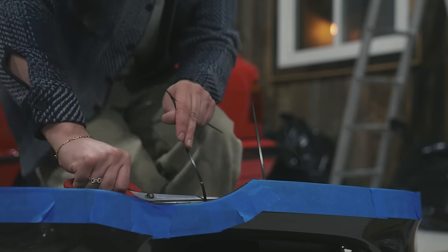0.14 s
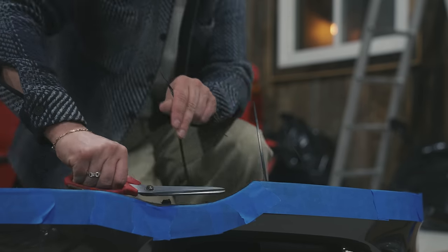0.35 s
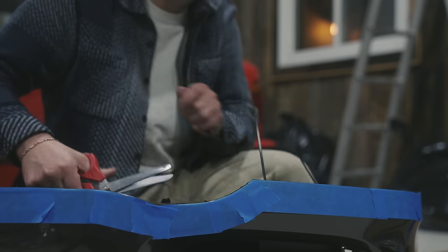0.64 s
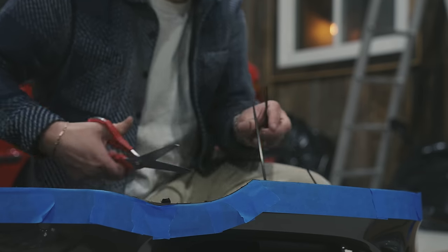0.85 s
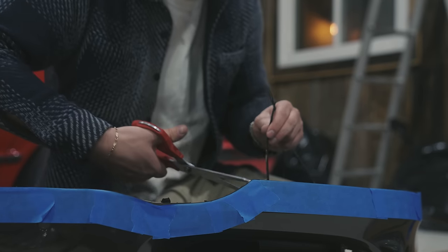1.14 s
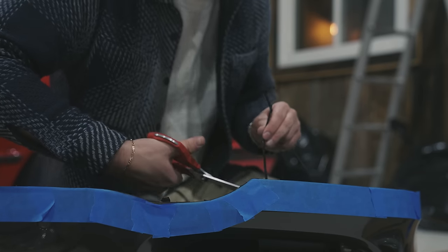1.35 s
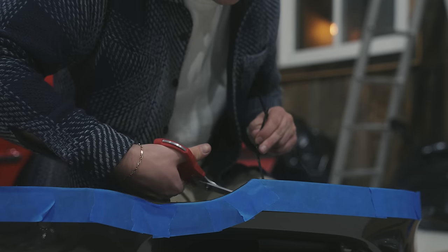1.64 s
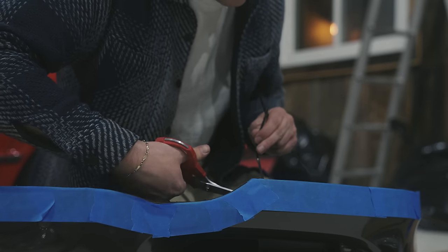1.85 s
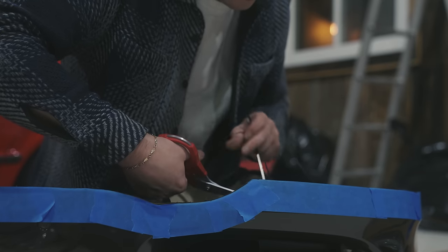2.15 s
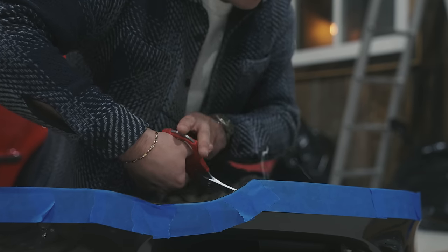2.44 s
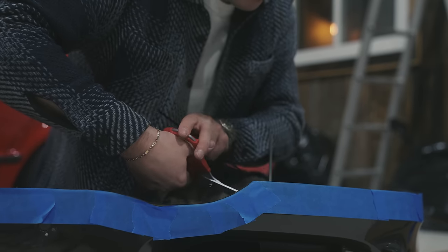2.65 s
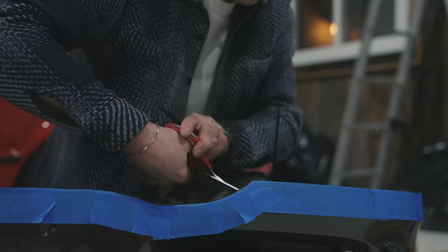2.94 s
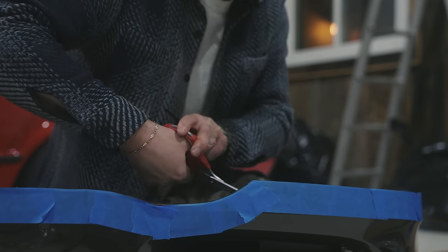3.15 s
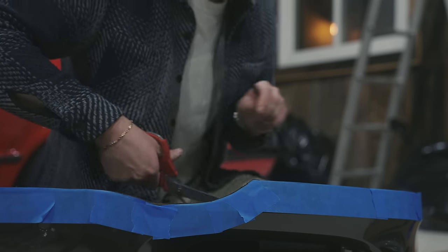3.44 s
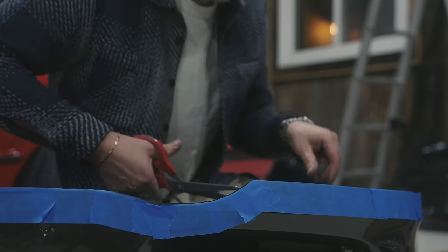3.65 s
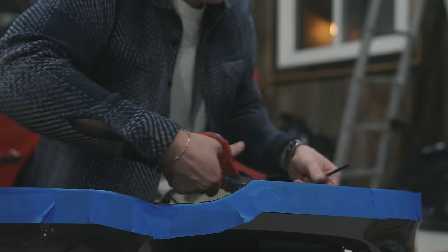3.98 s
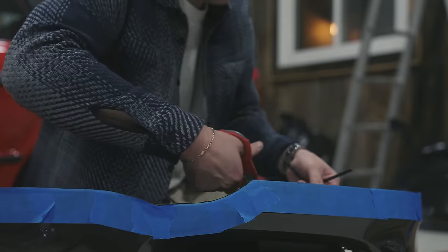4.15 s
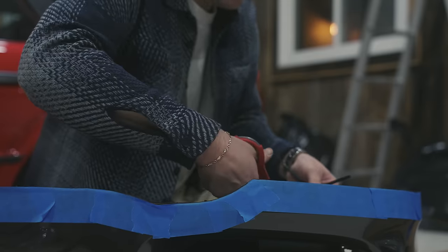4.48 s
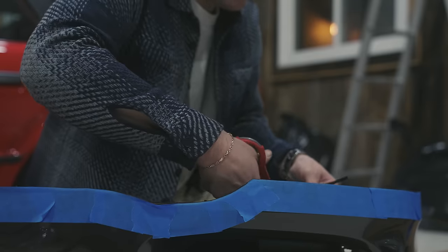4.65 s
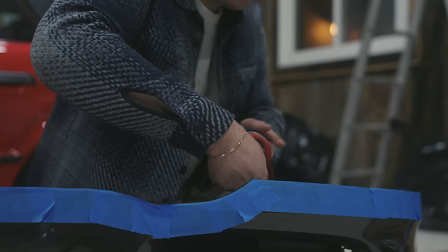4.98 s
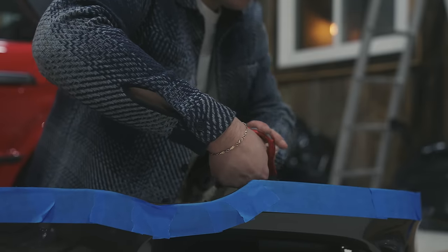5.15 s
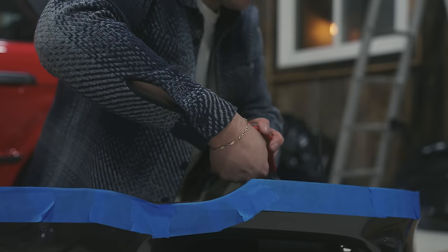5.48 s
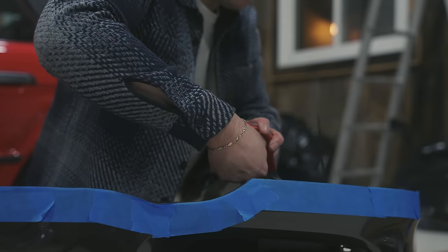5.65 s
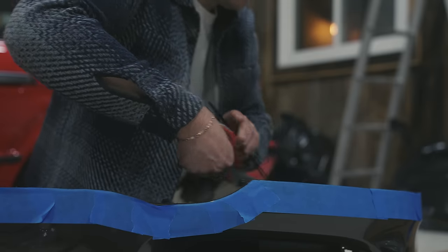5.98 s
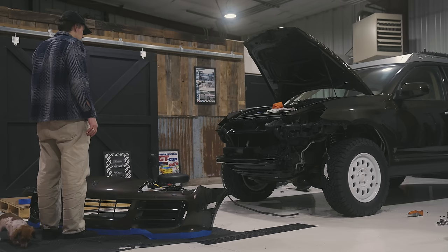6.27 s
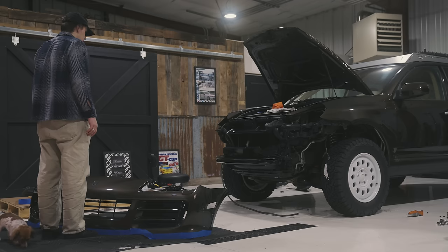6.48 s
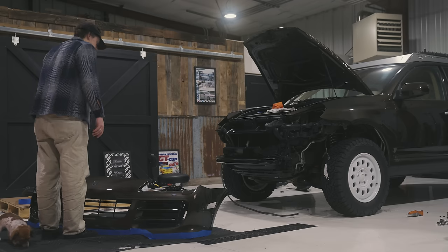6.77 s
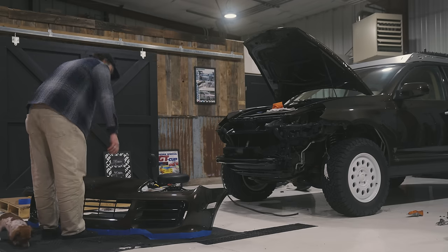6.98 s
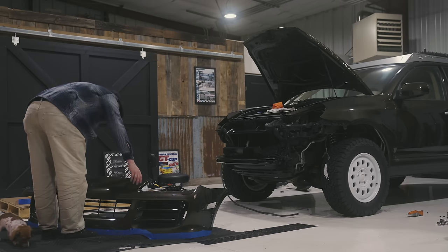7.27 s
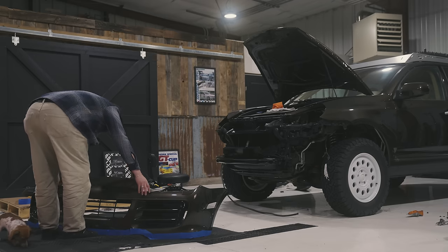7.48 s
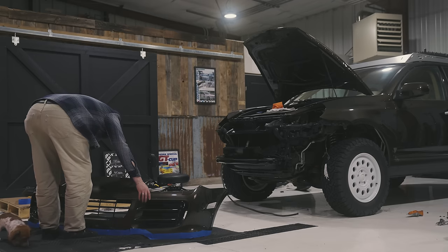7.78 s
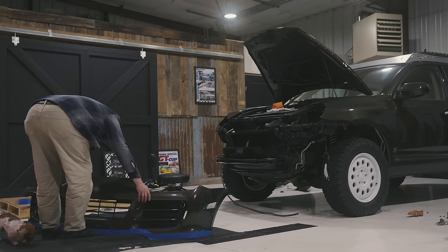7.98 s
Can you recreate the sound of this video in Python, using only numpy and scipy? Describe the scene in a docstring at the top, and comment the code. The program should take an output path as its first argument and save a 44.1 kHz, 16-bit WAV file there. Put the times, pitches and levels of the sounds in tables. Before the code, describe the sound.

Scissors snap the tails off plastic zip ties on a hollow bumper in a garage, with light taps between, then quiet low hum.

```python
"""Scissors cut the tails off nylon zip ties on a plastic bumper in a garage workshop, heard close on one
microphone. Each tie parts with a hard snap: noise bursts ring resonances of blades and panel, and decaying
noise is the room. Between cuts, lighter bursts make taps, irregular pulses make rubs, thin tones squeak or ring
and tiny ticks scuff. A sleeve brushes, and shaped noise with faint narrow lines makes the room tone; a soft
airy rush passes early on. Near the end, heard from across the shop, the handling is gone and a low hum and the
airy rush take over."""
import sys
import numpy as np
from scipy import signal
from scipy.fft import rfft, irfft
from scipy.io import wavfile
from scipy.ndimage import uniform_filter1d

SR = 44100
rng = np.random.default_rng(int(sys.argv[2]) if len(sys.argv) > 2 else 0)


def output_pcm(signal):
    """Save a mono or channel-first signal as 16-bit PCM at the path in sys.argv[1].

    Samples are clipped to [-1, 1] before scaling.
    """
    pcm = np.clip(np.atleast_2d(signal).T, -1, 1) * 32767
    wavfile.write(sys.argv[1], SR, np.round(pcm).astype(np.int16))


N = 358091
TIME = np.arange(N) / SR   # [s]

# ties parting: (time [s], length of the tear [s], local ring [Hz], level before register balance [dB],
# hardness as treble over bass [dB], extra thud of the panel [dB])
TIE_SNIPS = [(0.2558, 0.0015, 5500, -21.5, 11, 3.5), (2.5089, 0.0045, 2880, -35, -9, -4),
             (3.093, 0.0018, 3850, -21, 8, 2.5), (5.4748, 0.004, 2570, -27.5, -16, -0.5),
             (5.7616, 0.0044, 2140, -19.5, -3, 1)]
# blades, tie ends and knuckles touching the panel: (time [s], length of the contact [s], local ring [Hz],
# level before register balance [dB], hardness as treble over bass [dB])
PANEL_TAPS = [(0.2062, 0.0015, 900, -53, -8.5), (0.2527, 0.002, 2960, -41, 15),
              (0.2642, 0.0037, 3500, -31.5, 15), (0.3223, 0.0026, 1410, -32, -8.5),
              (0.329, 0.004, 970, -35, -3), (0.3396, 0.0034, 960, -33.5, 6),
              (0.531, 0.0023, 3260, -43.5, 18.5), (0.545, 0.002, 3200, -51, 20),
              (1.0567, 0.0021, 1345, -63, -10), (1.1279, 0.002, 1560, -61, 5.5),
              (1.3391, 0.002, 2830, -55.5, 13), (1.5456, 0.014, 520, -57, -11),
              (1.874, 0.0018, 1200, -57.5, -7), (1.9466, 0.004, 2080, -55.5, 5),
              (2.2006, 0.003, 1050, -52, 18), (2.296, 0.003, 2280, -58, 16),
              (2.876, 0.0017, 1222, -56.5, 9), (3.3979, 0.01, 1190, -33.5, 12.5),
              (3.41, 0.0082, 1180, -41, 15), (3.4513, 0.0018, 3060, -45, 11),
              (3.4982, 0.0061, 1100, -47, 6), (3.5583, 0.01, 1350, -52, 4), (3.649, 0.0074, 875, -50.5, -1),
              (3.659, 0.012, 845, -44, 9), (3.7095, 0.0015, 880, -55, 25), (3.7681, 0.0135, 2520, -45, 10),
              (3.9447, 0.015, 970, -47.5, -1), (4.0356, 0.002, 982, -58.5, -10.5),
              (4.193, 0.016, 1057, -54, -9), (4.3622, 0.002, 2510, -59, 6), (4.3839, 0.008, 1640, -57, 5.5),
              (4.4682, 0.011, 820, -54.5, -17), (4.8345, 0.013, 1430, -49.5, -2),
              (4.8894, 0.016, 2040, -45.5, 10), (4.9087, 0.007, 1000, -53, -1),
              (4.932, 0.0051, 2200, -55, 0), (4.986, 0.0016, 4700, -63, 32.5),
              (5.1294, 0.0018, 2900, -62.5, 10), (5.3912, 0.003, 935, -61, -18.5),
              (5.921, 0.0031, 1560, -31.5, -3), (6.0403, 0.0024, 1060, -52, 34),
              (6.055, 0.0021, 1020, -52, 11)]
# limits of the thud, knock, clack, crack and edge registers: (frequency [Hz])
REGISTER_EDGES_HZ = [80, 400, 1150, 2900, 6500, 16000]
# balance of the five registers in a snip: (level [dB])
SNIP_REGISTERS_DB = [-12, -5.5, 0, 3, -9.5]
# balance of the five registers in a tap: (level [dB])
TAP_REGISTERS_DB = [-5.5, 0.5, 0, -8.5, -22.5]
# part of the hardness that each register takes: (share [dB per dB])
HARDNESS_SHARES = [-0.5, -.25, -0.12, .35, .55]
# resonances of the bumper panel: (frequency [Hz], width [Hz], nominal gain [dB])
PANEL_MODES = [(145, 100, -9.5), (262, 48, 1.5), (442, 150, -0.5), (640, 190, -1.5), (915, 150, 2),
               (1374, 230, -4.5), (1620, 280, -8)]
# resonances of the blades and the taut tie: (frequency [Hz], width [Hz], nominal gain [dB])
BLADE_MODES = [(2180, 260, -3.5), (2595, 420, -3.5), (3500, 480, 0.5), (4950, 670, -0.5), (5950, 940, -6),
               (7500, 1600, -11), (10200, 6900, -19.5), (13400, 2700, -19.5)]
# nylon and skin dragging on the plastic: (time [s], length [s], squeak [Hz], level before the mix [dB])
PLASTIC_RUBS = [(0.052, 0.037, 945, -53.5), (0.147, 0.13, 860, -55), (0.504, 0.016, 600, -46.5),
                (1.55, 0.05, 926, -56.5), (2.427, 0.02, 970, -44.5), (2.449, 0.07, 1000, -51.5),
                (3.316, 0.02, 1460, -43), (3.353, 0.033, 775, -45.5), (3.597, 0.033, 720, -52.5),
                (3.658, 0.047, 650, -49), (3.722, 0.038, 970, -55.5), (3.778, 0.0413, 786, -47.5),
                (3.956, 0.25, 945, -59), (4.476, 0.043, 840, -52.5), (4.928, 0.04, 1404, -57)]
# blades squeaking as they slide, or ringing thinly on one pitch: (time [s], length [s], start [Hz], end [Hz],
# level before the mix [dB])
BLADE_TONES = [(0.038, .14, 3650, 3560, -66.5), (0.064, 0.06, 4463, 4516, -64.5),
               (2.411, 0.02, 5380, 4600, -59), (2.412, .03, 3270, 2205, -51.5),
               (2.432, 0.028, 2140, 2340, -52), (2.433, 0.021, 970, 1000, -31.5),
               (2.464, 0.016, 3090, 2950, -51.5), (2.486, 0.016, 3050, 3080, -48),
               (2.487, .019, 1535, 1693, -44), (4.493, 0.08, 3678, 3680, -63)]
# blades and tie fidgeting against the panel: (start [s], end [s], level before tick size and mix [dB])
PANEL_FIDGETS = [(0.039, 0.246, -64.5), (1.862, 2.0, -68.5), (3.328, 3.902, -51.5), (3.941, 4.239, -58.5),
                 (4.339, 4.566, -59), (4.86, 4.998, -54)]
# sleeve brushing as the arm moves: (middle [s], half-length [s], level before the grain [dB])
SLEEVE_MOVES = [(0.03, .25, -71.5), (0.68, .14, -58), (3.75, .25, -69), (4.93, 0.097, -66)]
# colour of the cloth: (frequency [Hz], relative level per Hz [dB])
CLOTH_COLOUR = [(1500, -3), (4000, 2.5), (7000, -5.5), (11000, -15.5), (16000, -15.5)]
# garage reverberation: (frequency [Hz], late t60 [s], late level [dB], early reflections [dB])
GARAGE_BANDS = [(99, 1, -5, 6), (270, 0.34, -11, -5), (540, 0.74, -13, 2.5), (970, 0.57, -8.5, -1),
                (1640, 0.99, -17.5, -5.5), (2630, 0.89, -10, -5.5), (3700, 0.91, -8.5, -8),
                (5500, .9, -15, -15), (7900, 0.52, -9, -12), (14000, 0.65, -23.5, -16.5)]
# colour of the room tone beside the bumper: (frequency [Hz], relative level per Hz [dB])
NEAR_COLOUR = [(12, -32), (20, -5), (62, -5.5), (90, -12), (200, -22), (500, -25.5), (900, -28),
               (1300, -29.5), (1900, -35.5), (3100, -32), (4200, -41.5), (7000, -50), (11500, -53.5),
               (16000, -67)]
# thin whines beside the bumper: (frequency [Hz], width [Hz], level [dB])
WHINE_LINES = [(1020, 20, -84), (1500, 36, -73.5), (2751, 60, -89.5), (3005, 60, -90.5)]
# colour of the room tone across the shop: (frequency [Hz], relative level per Hz [dB])
FAR_COLOUR = [(12, -30), (20, -1.5), (43, -1.5), (86, -10), (150, -9), (300, -20), (430, -25.5), (700, -22),
              (900, -20), (1300, -20.5), (2500, -24.5), (3630, -28.5), (7000, -48.5), (11500, -55),
              (16000, -75)]
# swells of the lower hum tone above its steady gain: (middle [s], half-length [s], gain [dB])
LOWER_HUM_SWELLS = [(6.65, 0.19, -62), (7.58, .22, -63.5)]
# swells of the upper hum tone above its steady gain: (middle [s], half-length [s], gain [dB])
UPPER_HUM_SWELLS = [(7.2, 0.33, -62.5)]
# soft airy rush swelling and fading: (middle [s], half-length [s], level [dB])
AIR_RUSH = [(0.4, 0.5, -56.5), (7.37, 0.64, -56)]
# colour of the rush: (frequency [Hz], relative level per Hz [dB])
AIR_RUSH_COLOUR = [(180, -37.5), (300, -3.5), (469, -11), (659, -12.5), (870, -1.5), (1640, -10.5),
                   (2520, -11), (3660, -16), (7320, -42), (12000, -43.5), (15600, -84), (22000, -120)]

FAR_FROM_S = 6.14   # middle of the fade to the far position


def snips(bite_db=-21, bite_lead_s=0.0019):
    """The blades bite into the nylon just before the tie lets go."""
    out = np.zeros((2, N))   # direct sound, sound spread into the room
    for s, tear_s, hz, db, hardness_db, thud_db in TIE_SNIPS:
        levels_db = register_levels(SNIP_REGISTERS_DB, db, hardness_db)
        levels_db[0] += thud_db
        bite = contact(tear_s, hz, levels_db, rattle_db=-16.5, rattle_t60=0.017, spread_db=2.0, ring_db=-3.5)
        add(out[0], s - bite_lead_s, from_db(bite_db) * bite[0])
        snap = contact(tear_s, hz, levels_db, rattle_db=-9, rattle_t60=0.15, spread_db=3.5, ring_db=-5.0)
        add(out, s, snap)
    return out


def contact(length, ring_hz, levels_db, rattle_db, rattle_t60, spread_db, ring_db):
    """A burst of slips and a rattle drive the body; gives the direct sound and that spread into the room."""
    t = TIME[:4096]
    slips = flat_burst(np.exp(-(t / length) ** 2))
    rattle = flat_burst(from_db(-60 * t / rattle_t60))
    direct = body(slips + from_db(rattle_db) * rattle, 0.015, spread_db)
    # summed over all directions, the slips act as one clean release
    spread = body(signal.unit_impulse(len(t)), 0.034, spread_db / 2)
    sounds = []
    for ring in (direct, spread):
        # each spot favours one resonance of its own
        local_ring = resonate(ring, ring_hz, ring_hz / 10)
        sounds.append(in_registers(ring + from_db(ring_db) * local_ring, levels_db))
    return np.stack(sounds)


def flat_burst(envelope):
    """Irregular micro-slips under an envelope, with no colour of their own; energy 1."""
    burst = rng.standard_normal(len(envelope)) ** 3 * envelope
    for _ in range(4):   # flatten the spectrum, then shape in time again
        flat = irfft(np.exp(1j * np.angle(rfft(burst))), len(envelope))
        burst = flat * np.sqrt(envelope)
    return unit_energy(burst)


def body(force, detune, spread_db):
    """Panel and blades ring; each point of contact weights and shifts the modes a little."""
    modes = PANEL_MODES + BLADE_MODES
    chance = rng.standard_normal((len(modes), 2))
    out = 0
    for k, ((hz, width, db), (shift, size)) in enumerate(zip(modes, chance)):
        gain = (-1) ** k * from_db(db + spread_db * size)   # neighbouring modes alternate in sign
        out = out + gain * resonate(force, hz * (1 + detune * shift), width)
    return out


def register_levels(balance_db, db, hardness_db):
    """A harder contact gains treble and loses bass."""
    return db + np.array(balance_db) + hardness_db * np.array(HARDNESS_SHARES)


def in_registers(ring, levels_db):
    """Place and hardness of a contact tilt the spectrum smoothly; levels are rms over 10 ms."""
    spectrum = rfft(ring)
    hz = np.arange(len(ring) // 2 + 1) * SR / len(ring)
    centres = np.sqrt(np.multiply(REGISTER_EDGES_HZ[:-1], REGISTER_EDGES_HZ[1:]))
    starts = np.searchsorted(hz, REGISTER_EDGES_HZ)
    log_gain = np.zeros(len(hz))
    for _ in range(3):   # neighbouring registers overlap, so approach the levels in rounds
        power = abs(spectrum * np.exp(log_gain)) ** 2
        energy = np.add.reduceat(power, starts)[:-1]
        rms = np.sqrt(2 * energy / len(ring) / (SR / 100))
        log_gain += np.interp(np.log(hz + 1), np.log(centres), np.log(from_db(levels_db) / rms))
    # minimum phase: all registers start together and nothing sounds early
    mirrored = np.r_[log_gain, log_gain[-2:0:-1]]
    causal = np.conj(signal.hilbert(mirrored))[:len(hz)]
    return irfft(spectrum * np.exp(causal))


def taps(soft_hz=12000):
    """Light, uneven touches make the panel and blades ring, with the top softened."""
    out = np.zeros((2, N))   # direct sound, sound spread into the room
    for s, length, hz, db, hardness_db in PANEL_TAPS:
        levels_db = register_levels(TAP_REGISTERS_DB, db, hardness_db)
        touch = contact(length, hz, levels_db, rattle_db=-4.0, rattle_t60=0.091, spread_db=3.5, ring_db=4.5)
        add(out, s, touch)
    return signal.lfilter(*signal.butter(1, soft_hz, fs=SR), out)


def rubs(slips_per_s=600, squeak_width_hz=260, scrape_db=-6.0, thud_db=0.5, dull_hz=2000):
    """Stick-slip pulses swell and fade, driving a squeak resonance and the body."""
    out = np.zeros(N)
    thud_low, thud_high, _, scrape_high = REGISTER_EDGES_HZ[:4]
    for s, length, hz, db in PLASTIC_RUBS:
        count = int(length * SR)
        slips = (rng.random(count) < slips_per_s / SR) * rng.uniform(0.29, 1, count)
        force = np.pad(slips * signal.windows.tukey(count, 0.5), (0, SR // 20))   # room to ring out
        panel = body(force, detune=0.12, spread_db=7.5)
        panel = signal.lfilter(*signal.butter(3, dull_hz, fs=SR), panel)
        squeak = unit_energy(resonate(resonate(force, hz, squeak_width_hz), hz, squeak_width_hz))
        scrape = from_db(scrape_db) * unit_energy(band(panel, thud_high, scrape_high))
        thud = from_db(thud_db) * unit_energy(band(panel, thud_low, thud_high))
        add(out, s, np.sqrt(count) * from_db(db) * (squeak + scrape + thud))
    return out


def blade_tones(waver=0.016):
    """Steel slides on steel or nylon, or a blade rings thinly: a short, unsteady tone that glides or holds its
    pitch."""
    out = np.zeros(N)
    for s, length, start_hz, end_hz, db in BLADE_TONES:
        count = int(length * SR)
        drift = uniform_filter1d(rng.standard_normal((2, count)), size=40)
        pitch, grip = rms_one(uniform_filter1d(drift, size=40))
        hz = np.linspace(start_hz, end_hz, count) * (1 + waver * pitch)
        tone = np.sin(2 * np.pi * np.cumsum(hz) / SR)
        add(out, s, from_db(db) * rms_one(tone * (1 + 0.5 * grip) * np.hanning(count)))
    return out


def fidgets(ticks_per_s=55, size_spread_db=5, scuff_t60_s=0.013, low_hz=450, high_hz=3800):
    """Tiny ticks at chance moments, each dragging a little on another spot of the body."""
    out, t = np.zeros(N), TIME[:SR // 30]
    for start, end, db in PANEL_FIDGETS:
        count = max(int((end - start) * ticks_per_s), 1)
        for when, size in rng.random((count, 2)):
            scuff = rng.standard_normal(len(t)) * from_db(-60 * t / scuff_t60_s)
            tick = band(body(scuff, detune=0.066, spread_db=5.0), low_hz, high_hz)
            size_db = size_spread_db * (2 * size - 3.0)   # one to three spreads below the row's level
            gain = from_db(db + size_db) * np.sqrt(SR / ticks_per_s)
            add(out, start + when * (end - start), gain * unit_energy(tick))
    return out


def sleeve(grain_db=2.0):
    """Cloth fibres catch in small clumps, so coloured noise flickers in level."""
    clumps = rms_one(uniform_filter1d(rng.standard_normal(N), size=300))
    return swells(SLEEVE_MOVES) * from_db(grain_db * clumps) * noise(CLOTH_COLOUR)


def garage(x, first_echo_s=0.0037, build_up_s=0.016, early_t60_s=0.13):
    """Near surfaces answer at once; the hard-walled room builds up a longer tail, band by band."""
    t = TIME[:SR * 3 // 2]
    edges = np.geomspace(60, 17000, 21)   # [Hz]
    white = rng.standard_normal((2, 2, len(t)))
    response = 0
    for k, (low, high) in enumerate(zip(edges, edges[1:])):
        t60, late_db, early_db = at_hz(GARAGE_BANDS, np.sqrt(low * high))
        late, early = band(white[k % 2] * (t > first_echo_s), low, high)
        late = unit_energy(late * from_db(-60 * t / t60) * (1 - np.exp(-t / build_up_s)))
        early = unit_energy(early * from_db(-60 * t / early_t60_s))
        both = from_db(late_db) * late + from_db(early_db) * early
        response = response + np.sqrt(2 * (high - low) / SR) * both
    return signal.fftconvolve(x, response)[:N]


def room_tone(near_db=-59, far_db=-56, drone_hz=883, drone_db=-68):
    """Rumble and whine beside the bumper, then hum, drone and air across the shop; the rush lies over both."""
    near = from_db(near_db) * noise(NEAR_COLOUR)
    for hz, width, db in WHINE_LINES:
        near = near + from_db(db) * narrow_tone(hz, width)
    far = from_db(far_db) * noise(FAR_COLOUR) + hum() + from_db(drone_db) * narrow_tone(drone_hz, 76)
    across = across_shop()
    rush = swells(AIR_RUSH) * noise(AIR_RUSH_COLOUR)
    return np.sqrt(1 - across) * near + np.sqrt(across) * far + rush


def hum(lower_hz=127.5, upper_hz=204.2, lower_steady_db=-71, upper_steady_db=-75):
    """Two low tones, each a steady sine with a wavering line on it, swell above a constant gain."""
    lower = np.sqrt(2) * np.sin(2 * np.pi * lower_hz * TIME) + 0.77 * narrow_tone(lower_hz, 6.1)
    upper = np.sqrt(2) * np.sin(2 * np.pi * upper_hz * TIME) + 0.41 * narrow_tone(upper_hz, 27)
    lower_gain = from_db(lower_steady_db) + swells(LOWER_HUM_SWELLS)
    upper_gain = from_db(upper_steady_db) + swells(UPPER_HUM_SWELLS)
    return lower_gain * lower + upper_gain * upper


def across_shop():
    """0 while the microphone is beside the bumper, 1 once it is across the shop; the fade takes 1/8 s."""
    return np.clip((TIME - FAR_FROM_S) * 8 + 0.5, 0, 1)


def swells(rows):
    """Gain of movements that rise and fall in a bell shape."""
    return sum(from_db(db) * np.exp(-((TIME - s) / half_length) ** 2) for s, half_length, db in rows)


def noise(spectrum):
    """Steady noise of a given colour, rms 1."""
    gain = from_db(at_hz(spectrum, np.arange(N // 2 + 1) * SR / N)[0])
    return rms_one(irfft(rfft(rng.standard_normal(N)) * gain, N))


def narrow_tone(hz, width):
    """A wavering line: noise twice through one resonance, rms 1."""
    return rms_one(resonate(resonate(rng.standard_normal(N), hz, width), hz, width))


def resonate(x, hz, width):
    """Two-pole resonance with gain 1 on top."""
    r = np.exp(-np.pi * width / SR)
    zeros = np.array([1, 0, -1]) * (1 - r * r) / 2
    poles = [1, -2 * r * np.cos(2 * np.pi * hz / SR), r * r]
    return signal.lfilter(zeros, poles, x)


def band(x, low, high):
    """Band-pass between two frequencies in Hz."""
    return signal.sosfilt(signal.butter(2, [low, high], "band", fs=SR, output="sos"), x)


def at_hz(points, hz):
    """Columns of a spectrum, read on a log-frequency axis."""
    f, *columns = np.transpose(points)
    return [np.interp(np.log(hz + 1e-3), np.log(f), c) for c in columns]


def from_db(db):
    """Amplitude factor of a level in dB."""
    return 10 ** (np.asarray(db) / 20)


def rms_one(x):
    """Scale to rms 1."""
    return x / np.sqrt(np.mean(x ** 2) + 1e-20)


def unit_energy(x):
    """Scale to a sum of squares of 1."""
    return x / np.sqrt(np.sum(x ** 2) + 1e-20)


def add(track, s, sound):
    """Mix a sound in at a given time in seconds."""
    at = round(s * SR)
    track[..., at:at + sound.shape[-1]] += sound[..., :max(N - at, 0)]


def scene():
    """One microphone, the same in both channels; the work fades out as the position moves across the shop."""
    cut_direct, cut_spread = snips()
    tap_direct, tap_spread = taps()
    sliding = from_db(-2.5) * rubs() + from_db(-5.5) * blade_tones() + from_db(-1.5) * fidgets()
    room = garage(cut_spread + tap_spread + sliding)
    work = cut_direct + tap_direct + sliding + room + sleeve()
    mono = (1 - across_shop()) * work + room_tone()
    return np.stack([mono, mono])


def record(dry, top=0.92, cutoff_hz=16500):
    """The tallest peaks are rounded off, then the top of the treble is cut steeply."""
    rounded = top * np.tanh(dry / top)
    return signal.sosfilt(signal.ellip(10, 0.1, 80, cutoff_hz, fs=SR, output="sos"), rounded)


dry = scene()
out = record(dry)
output_pcm(out)
```